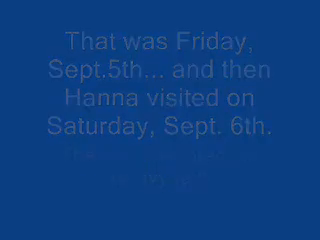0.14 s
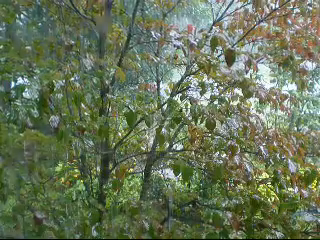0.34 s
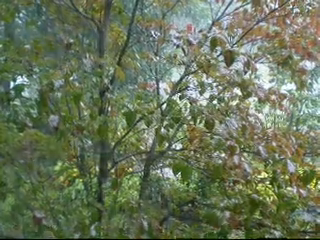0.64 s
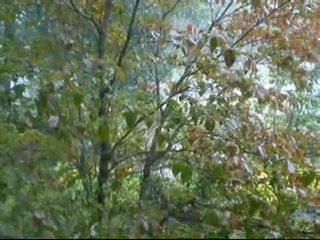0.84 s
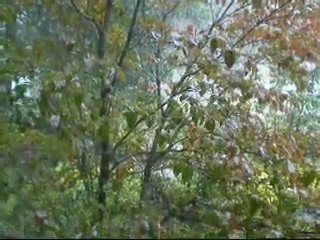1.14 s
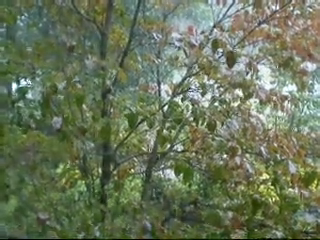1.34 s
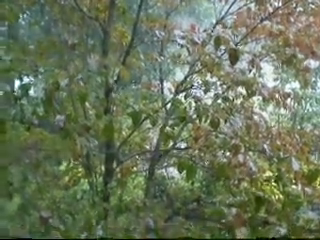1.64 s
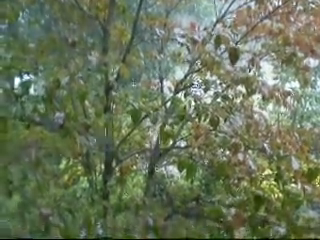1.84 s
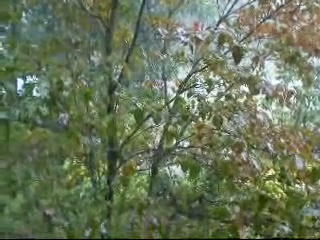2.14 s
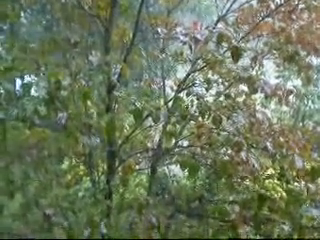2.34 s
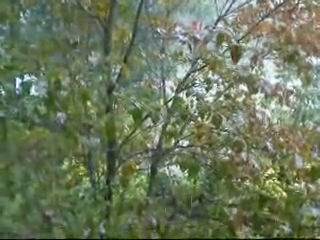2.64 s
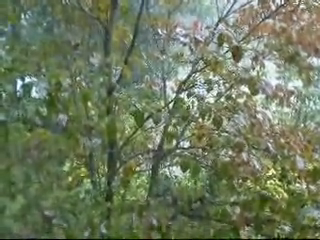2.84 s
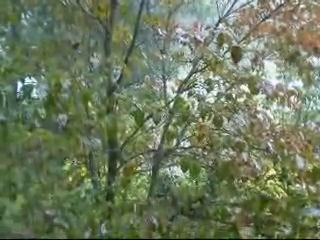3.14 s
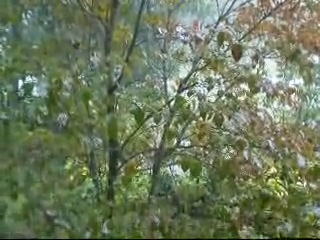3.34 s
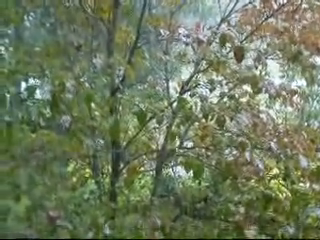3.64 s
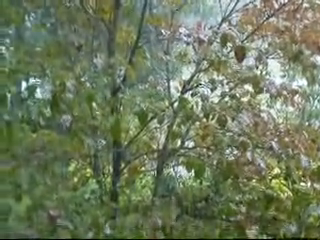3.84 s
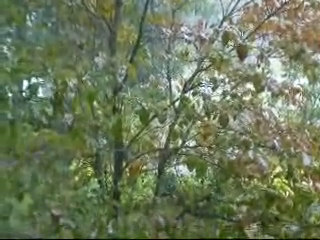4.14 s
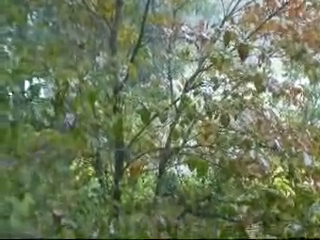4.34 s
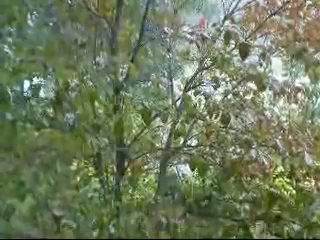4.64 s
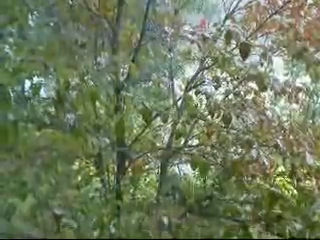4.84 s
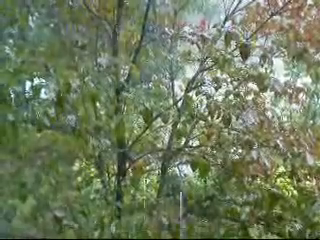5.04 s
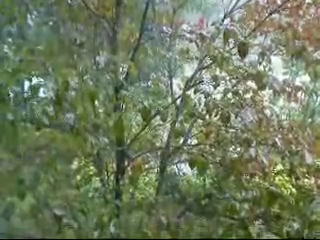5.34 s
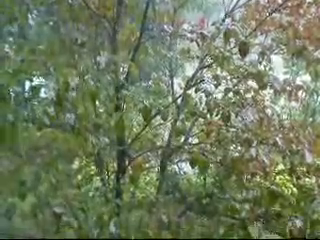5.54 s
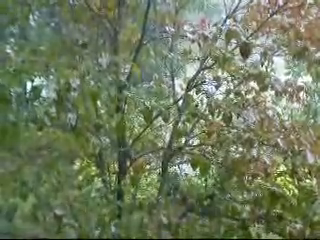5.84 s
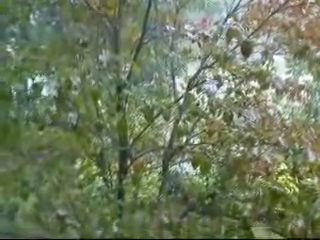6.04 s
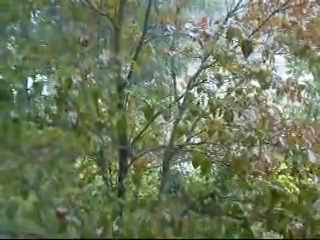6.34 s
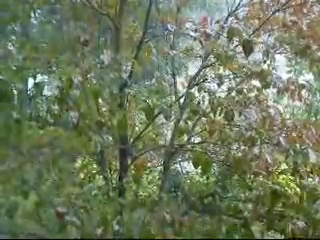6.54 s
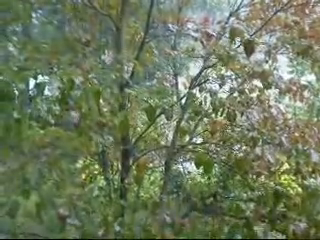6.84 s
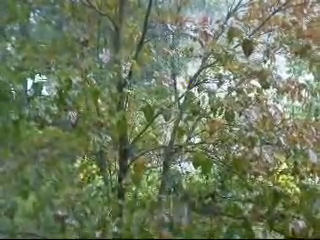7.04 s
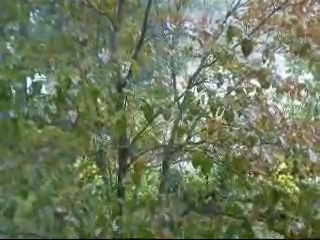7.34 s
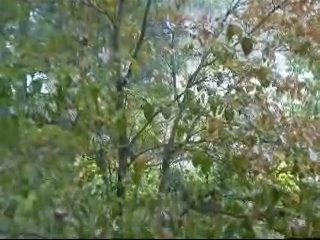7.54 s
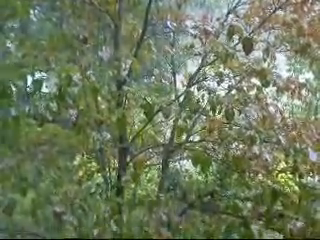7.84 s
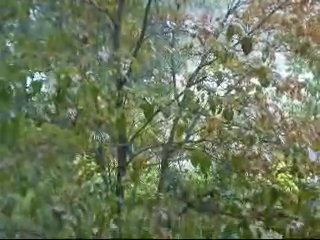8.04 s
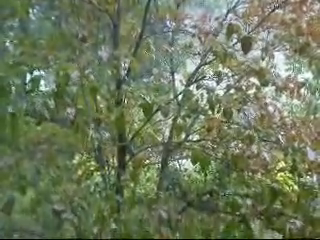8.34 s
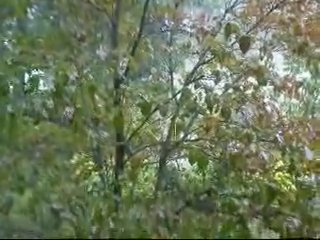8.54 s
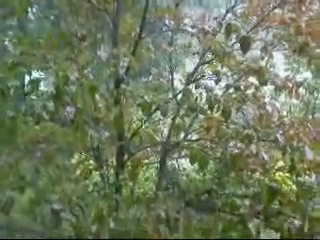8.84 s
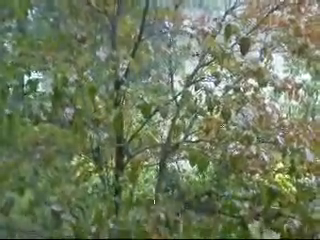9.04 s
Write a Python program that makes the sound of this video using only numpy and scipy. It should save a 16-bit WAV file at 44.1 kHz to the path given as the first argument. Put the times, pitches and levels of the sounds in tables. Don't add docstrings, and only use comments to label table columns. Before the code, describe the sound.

Half a second of silence, then a downpour in leafy trees starts at once. A dense, mid-heavy hiss of far drops carries rapid patter on leaves. Sharp ticks and small splashes land close by, the strongest near the middle of the second second and late in the stretch. Brief flurries swell as branches shed water. A cheap mono camera microphone ducks and recovers, with grainy, slightly watery treble.

```python
import sys
import numpy as np
from scipy import signal
from scipy.fft import rfft, irfft
from scipy.io import wavfile
from scipy.ndimage import uniform_filter1d

SR = 44100
rng = np.random.default_rng(int(sys.argv[2]) if len(sys.argv) > 2 else 0)


def undo_db(level):
    steps = np.asarray(level, float) / 20
    return 10 ** steps


def unload_audio(sound):
    columns = np.transpose(np.atleast_2d(sound))
    steps = np.round(np.clip(columns, -1, 1) * 32767)
    wavfile.write(sys.argv[1], SR, steps.astype(np.int16))


N = 404838

START_S = .4665
HALF_RATE_HZ = 8000
TICK_CYCLES = 2.1
# (frequency [Hz], level [dB per Hz])
RAIN_SPECTRUM = [(20, -9.5), (70, -8.5), (110, -9), (170, -9), (280, -2.5), (430, -4), (800, -3),
                 (1200, -1), (1600, -3.5), (2060, -3.5), (3000, -9), (4900, -12.5), (6040, -11),
                 (7000, -15)]
TOP_EDGES_HZ = [11200, 12020, 14550, 15750]
# (time [s], step [dB])
STEP_GROWTH = [(.5, -4.5), (1.3, -3.3), (2.3, -1.3), (3.5, 0), (5, .5), (9.2, 1)]


def evened(x):
    return x / np.sqrt(np.mean(x ** 2) + 1e-20)


def read(points, hz):
    f, value = np.transpose(points)
    return np.interp(np.log(hz + 1), np.log(f + 1), value)


def add(mix, s, sound):
    part = mix[round(s * SR):][:len(sound)]
    part += sound[:len(part)]


def band(x, low_hz, high_hz, points=((1, 0), (2, 0))):
    hz = np.fft.rfftfreq(len(x), 1 / SR)
    inside = (hz > low_hz) * (hz < high_hz)
    return irfft(rfft(x) * undo_db(read(points, hz)) * inside, len(x))


def tick(hz, length_s, rise=.5, sharp=2):
    t = np.arange(512) / SR
    u = t / (rise * length_s)
    swell = (u * np.exp(1 - u)) ** sharp
    return swell * np.sin(2 * np.pi * (hz * t + rng.random()))


def wash(level_db=-32, patchy_db=1.0, flicker_db=0.53):
    frames = N // 128 + 5
    real, imaginary, patches = rng.standard_normal((frames, 257, 3)).T
    patches = uniform_filter1d(patches, size=8, axis=0)
    patches = evened(uniform_filter1d(patches, size=14, axis=1))
    flicker = evened(uniform_filter1d(rng.standard_normal(frames), size=4))
    z = (real + 1j * imaginary) * undo_db(patchy_db * patches + flicker_db * flicker)
    noise = signal.istft(z, nperseg=512, noverlap=384)[1][:N]
    return undo_db(level_db) * evened(band(noise, 5, HALF_RATE_HZ, RAIN_SPECTRUM))


def patter(level_db=-33, per_s=1300, spread_db=3.6, cycles=1.2, low_hz=750, high_hz=6500):
    rank = np.minimum(rng.exponential(1, N), 3.4)
    size = undo_db(spread_db * rank) * (rng.random(N) < per_s / SR)
    leaf = rng.integers(0, 24, N)
    out = np.zeros(N)
    for k, hz in enumerate(np.geomspace(low_hz, high_hz, num=24)):
        out += signal.oaconvolve(size * (leaf == k), tick(hz, cycles / hz) * hz ** .8)[:N]
    return undo_db(level_db) * evened(band(out, 9.1, HALF_RATE_HZ, RAIN_SPECTRUM))


def strays(per_s=14, level_db=-24, leaf_hz=3900):
    out = np.zeros(N)
    for when, size, pitch in rng.random((round(per_s * N / SR), 3)):
        hz = leaf_hz * (.85 + .25 * pitch)
        add(out, when * N / SR, undo_db(level_db + 5 * size) * tick(hz, TICK_CYCLES / hz))
    return out


def drops(rattle_db=-18, rattle_s=.01, middle_db=-3, rise=0.81):
    # (time [s], peak [dB], leaf pitch [Hz], length [ms],
    # splash above 5 kHz against the tick [dB])
    close_drops = [(0.4817, -10.5, 3400, 0.19, -10), (0.536, -13, 2080, 0.71, -8),
                   (0.7318, -16.5, 1180, 1.5, -11), (0.8827, -13, 3270, 0.4, -12),
                   (1.0112, -10, 3370, .34, -5), (1.1289, -11, 3960, 0.53, -12),
                   (1.6876, -3, 1880, 1.15, -9.5), (2.1526, -14, 2710, 0.36, -9),
                   (2.3154, -12, 1110, 2.7, -19), (2.5602, -15, 2720, 1.1, -6.5),
                   (2.7471, -15, 2880, 0.71, -7), (3.3266, -14.5, 3980, 0.77, -13),
                   (3.4118, -7.5, 3100, .36, -9.5), (3.9924, -6, 1380, 0.27, -16),
                   (5.3615, -23, 2630, 1.3, -10), (5.4748, -15, 2930, 0.56, -11),
                   (5.9427, -17, 1680, 0.82, -10), (6.7163, -14, 2700, 0.86, -14),
                   (6.7307, -15, 2170, 1.7, -11.5), (7.5402, 0.5, 2200, 1.54, -8.5),
                   (7.772, -13, 3530, 0.36, -8), (8.029, -15, 2450, 0.48, -8),
                   (8.6043, -15, 3850, 0.47, -13), (8.8757, -1, 2290, 0.67, -8)]
    # (time [s], peak [dB], leaf pitch [Hz])
    faint_ticks = [(.5134, -22, 3370), (0.939, -22, 3300), (1.701, -19, 1930), (2.2398, -14, 3440),
                   (2.59, -20, 1340), (2.6893, -15, 3580), (3.176, -18, 4000), (3.2759, -14, 4010),
                   (3.4359, -14, 2240), (3.6421, -25, 3370), (4.116, -21, 2410), (4.2466, -15.5, 3840),
                   (4.4265, -18, 3830), (4.535, -19, 3760), (4.9308, -13.5, 3940), (4.9444, -17, 3530),
                   (5.2126, -15, 3750), (5.6004, -19, 3900), (5.7345, -17, 3000), (6.6997, -19, 3250),
                   (6.885, -14, 3780), (6.919, -19, 3810), (6.9733, -17.5, 3700), (7.1234, -13, 2310),
                   (7.6336, -20, 3840), (7.819, -14, 3640), (7.9094, -15, 3820), (9.0672, -20, 3000),
                   (8.2858, -14, 3000), (8.6288, -19, 3150)]
    out, t = np.zeros(N), np.arange(1500) / SR
    for s, peak_db, hz, length_ms, splash_db in close_drops:
        length_s = length_ms / 1000
        splash = tick(rng.uniform(5600, 6180), length_s, rise, sharp=4.6)
        middle = tick(rng.uniform(3300, 4700), length_s, rise, sharp=8.5)
        bright = splash + undo_db(middle_db) * middle
        hit = tick(hz, length_s, rise, sharp=5.5) + undo_db(splash_db + 1.0) * bright
        landings = rng.random(len(t)) < 400 / SR
        droplets = landings * rng.standard_normal(len(t)) * np.exp(-t / rattle_s)
        add(out, s - 0.33 * length_s, undo_db(peak_db) * hit)
        add(out, s + .003, undo_db(peak_db + rattle_db) * np.convolve(droplets, hit))
    for s, peak_db, hz in faint_ticks:
        add(out, s, undo_db(peak_db - 2.5) * tick(hz, TICK_CYCLES / hz))
    return band(out, 300, HALF_RATE_HZ)


def flurries(rise_s=0.031):
    # (start [s], swell [dB], weight of heavy drops [dB])
    sheddings = [(0.498, 4, -3), (0.526, 4.5, 1), (0.79, 6, 1.5), (0.847, 1, 0), (0.94, 0.5, -2),
                 (1.831, 2.5, 3), (2.727, 2.5, -1), (3.027, 5.5, 0.5), (3.152, 4.0, -1.3), (3.359, 3, -2.5),
                 (3.619, 5, 3), (3.878, 3, 0.2), (3.947, 5.5, 2), (4.263, 1, 0.7), (4.571, 3, 1),
                 (4.774, 4, 0.5), (4.84, 1.5, 2.0), (5.415, 4, -2.2), (5.481, 2, -0.4), (6.676, 1.5, -1.5),
                 (6.899, 3.0, -0.3), (6.997, 3.2, -2.5), (7.255, 4, -1.3), (7.741, 2.5, -2),
                 (8.147, 5.0, 0), (8.402, 3, -0.2), (8.47, 2.5, -1), (8.847, 2, -0.0), (9.022, 1.5, 3),
                 (9.119, 4, -0.5)]
    t, out = np.arange(0, N, 16) / SR, 0
    for s, swell_db, weight_db in sheddings:
        u = np.maximum(t - s, 0) / rise_s
        out = out + np.outer([swell_db, weight_db], (u * np.exp(1 - u)) ** 2)
    return t, out


def gain(recover_s=0.12):
    # (time [s], level [dB])
    downpour = [(0.47, 2.0), (0.98, -2.5), (1.49, 1.5), (2.01, -0.2), (2.52, 1.7), (3.03, -4), (3.54, -1),
                (4.06, -1.55), (4.57, 1.5), (5.08, 3.5), (5.59, -2.5), (6.11, 2), (6.62, 1.0), (7.13, -2.5),
                (7.64, 6), (8.16, 0.1), (8.67, -0.14), (9.18, -4)]
    # (time [s], step [dB])
    snaps = [(0.4867, -11.0), (0.589, -0.5), (0.976, -1), (1.167, -5.5), (1.192, -7), (1.381, -6.5),
             (1.496, -4.0), (1.538, -7), (2.151, -3.5), (2.357, -10), (2.905, -3.5), (3.443, -2.5),
             (3.659, -7), (3.838, -4), (4.121, -8), (4.386, -9), (4.634, -7), (4.897, -10.3), (4.98, -7),
             (5.997, -6.5), (6.291, -6.5), (6.474, -5.5), (6.52, -5), (7.129, -8), (7.49, -5.5), (7.61, -4),
             (7.646, -6), (7.679, -9.5), (8.027, -10.5), (8.227, -3)]
    t, (swell_db, weight_db) = flurries()
    level_db = np.interp(t, *np.transpose(downpour)) + swell_db
    for s, step_db in snaps:
        creep = np.exp(-np.maximum(t - s, 0) / recover_s)
        level_db = level_db + step_db * (t > s) * creep
    every_s = np.arange(N) / SR
    return [undo_db(np.interp(every_s, t, uniform_filter1d(db, size=3))) for db in (level_db, weight_db)]


def scene():
    level, body = gain()
    bed = wash() + patter() + strays()
    heavy = band(bed, 250, 1300, [(250, 1.5), (500, -2), (1000, 1.0), (1500, -3)])
    bed = bed + (body - 1) * heavy
    bed = bed * level / np.sqrt(np.mean(level[SR:] ** 2))
    fade_in = np.clip((np.arange(N) / SR - START_S) / 0.0047, 0, 1)
    return np.tile((bed + drops()) * fade_in, (2, 1))


def slow_converter(x, ceiling=.41):
    # (frequency [Hz], gain [dB])
    guard = [(6900, 0), (7200, -5), (7450, -11), (7700, -12.5), (8000, -12.5)]
    # (frequency [Hz], gain [dB])
    mirror = [(8000, 1), (10000, -4), (10600, -6), (11200, -8.5)]
    x = band(ceiling * np.tanh(x / ceiling), 1, HALF_RATE_HZ, guard)
    mirrored = 2 * x * np.cos(2 * np.pi * 2 * HALF_RATE_HZ * np.arange(N) / SR)
    return x + band(mirrored, HALF_RATE_HZ, TOP_EDGES_HZ[0], mirror)


def thinned(x, size=2048, spill_db=-11.5):
    # (frequency [Hz], step [dB])
    step_spectrum = [(20, 5), (75, 4), (105, -3), (200, -5), (300, -13), (450, -22), (6500, -21),
                     (7100, -13.5), (8900, -13.5), (9600, -14), (11200, -11)]
    # (from [s], to [s])
    careful_spans = [(.4, .62), (.96, 1.2), (1.66, 1.72), (2.08, 2.28), (2.72, 2.8), (3.24, 3.46),
                     (4.38, 4.46), (4.86, 4.98), (7.52, 7.58), (7.7, 7.82), (8.85, 8.92)]
    n, k = np.arange(2 * size), np.arange(size * 5 // 9)
    window = np.sin(np.pi * (n + .5) / (2 * size))
    basis = window * np.cos(np.pi / size * np.outer(k + .5, n + .5 + size / 2))
    padded = np.pad(x, (size, 2 * size))
    blocks = np.lib.stride_tricks.sliding_window_view(padded, 2 * size)[::size]
    lines = blocks @ basis.T * np.sqrt(2 / size)
    loud = np.sqrt((lines ** 2).sum(1) / 200 + 1e-12)

    s = np.arange(len(blocks)) * size / SR
    careful = sum((s > start) & (s < end) for start, end in careful_spans)
    block_db = np.interp(s, *np.transpose(STEP_GROWTH)) - 1.2 * careful
    block_db = block_db + .8 * rng.standard_normal(len(s))
    step = np.outer(loud * undo_db(block_db), undo_db(read(step_spectrum, (k + .5) * SR / (2 * size))))
    spill = np.outer(loud * careful, k < 9) * undo_db(spill_db) * rng.standard_normal(lines.shape)
    error = (lines - step * np.round(lines / step) + spill) @ basis * np.sqrt(2 / size)
    out = np.zeros(len(padded))
    for b, block in enumerate(error):
        out[b * size:(b + 2) * size] += block
    return x - out[size:size + N]


def top_noise(x, dust_db=-78):
    fill_db = [-56.5, -63, -74]
    t = np.arange(N) / SR
    treble = evened(np.sqrt(abs(uniform_filter1d(band(x, 3000, 7000) ** 2, size=900))))
    noise = treble * rng.standard_normal(N)
    for low, high, db in zip(TOP_EDGES_HZ, TOP_EDGES_HZ[1:], fill_db):
        growth_db = 1.3 * (low > 14000) * np.interp(t, *np.transpose(STEP_GROWTH))
        x = x + undo_db(db + growth_db) * evened(band(noise, low, high))
    gaps = np.repeat(rng.random(N // 1024 + 2), 1024)[483:][:N] < .75 - .25 * t
    x = x - uniform_filter1d(1. * gaps, size=300) * band(x, 15150, 16000)
    present = np.repeat(rng.random(N // 2048 + 1) < .72, 2048)[:N] * np.clip(t - 3, 0, 1)
    return x + undo_db(dust_db) * band(evened(band(noise, 7200, 8800)) * present, 7200, 8800)


def low_pass(x):
    return signal.sosfilt(signal.butter(12, 15830, fs=SR, output="sos"), x)


def record(dry):
    x = top_noise(thinned(slow_converter(dry[0])))
    t = np.arange(N) / SR
    offset = -0.018 * np.clip((t - START_S) / 0.016, 0, 1)
    x = (x + offset) * (t > START_S - .009)
    return low_pass(np.tile(x, (2, 1)))


dry = scene()
out = record(dry)
unload_audio(out)
```